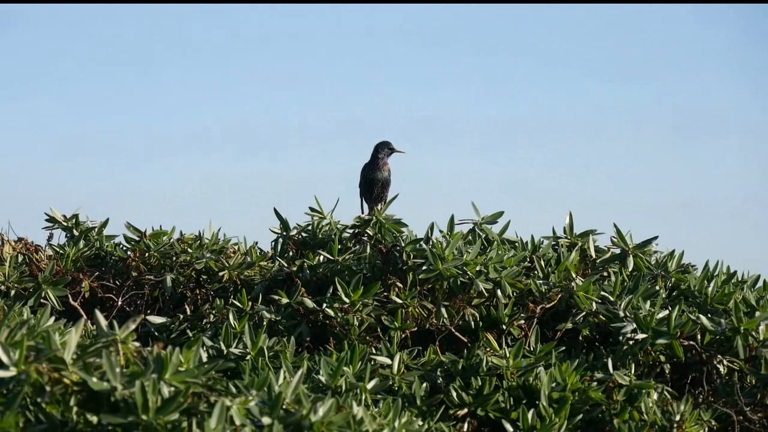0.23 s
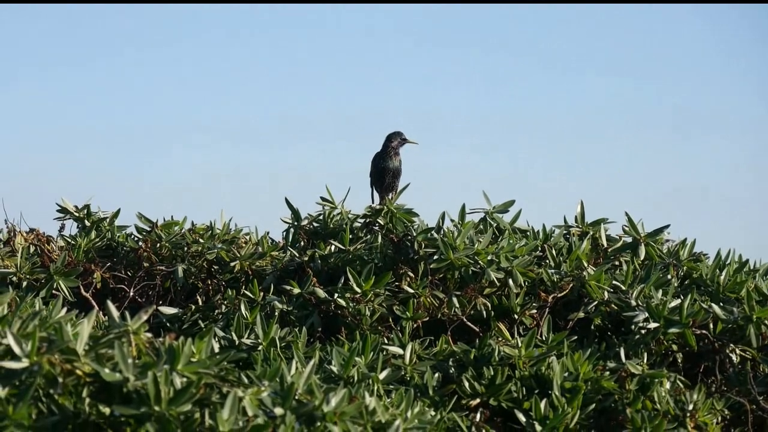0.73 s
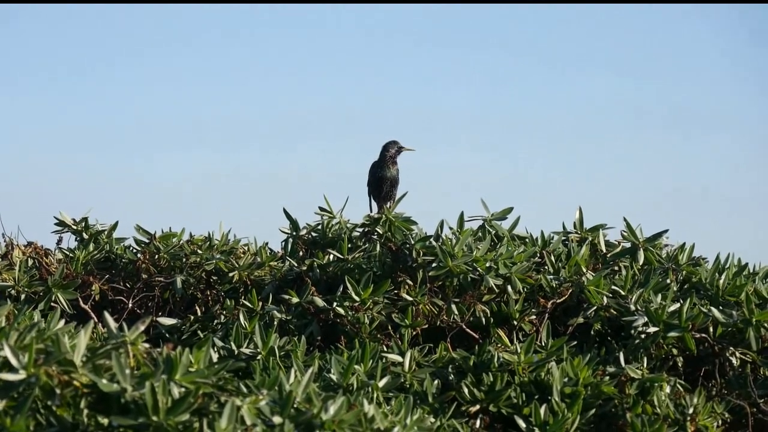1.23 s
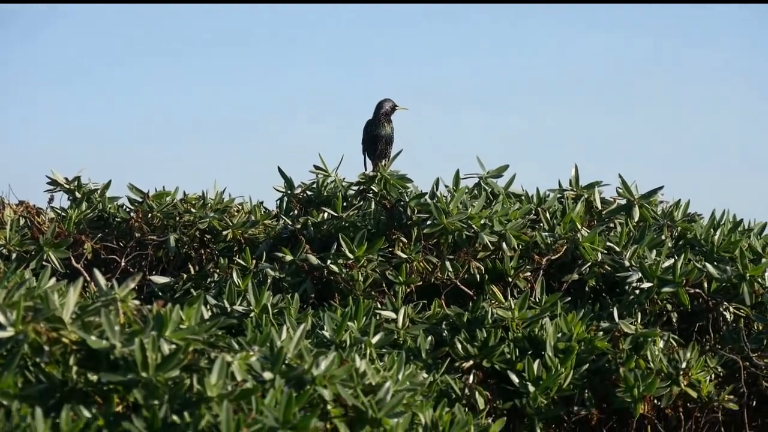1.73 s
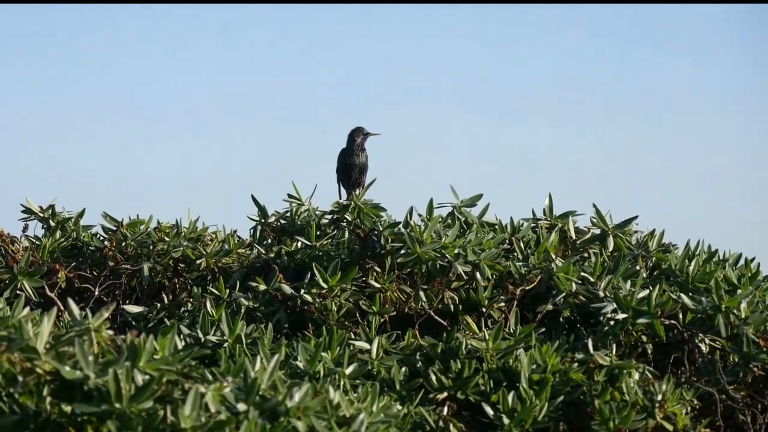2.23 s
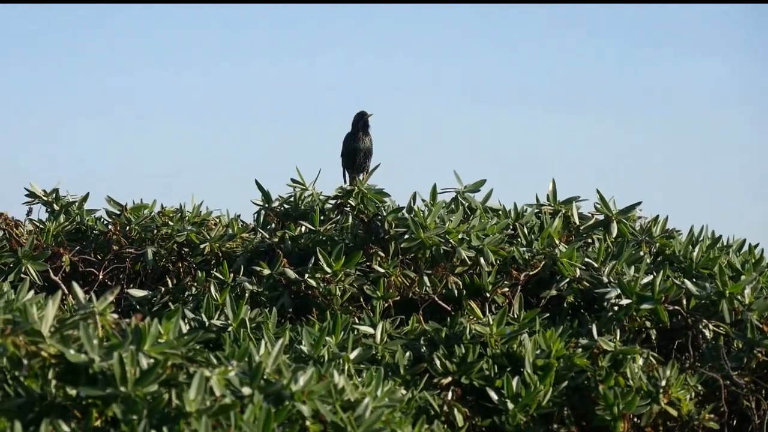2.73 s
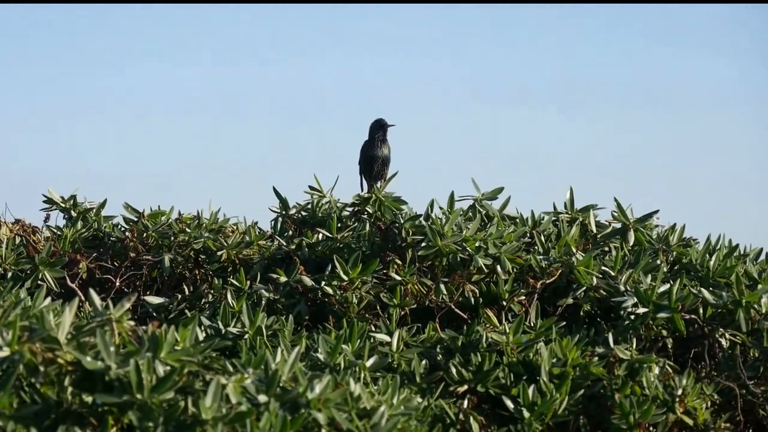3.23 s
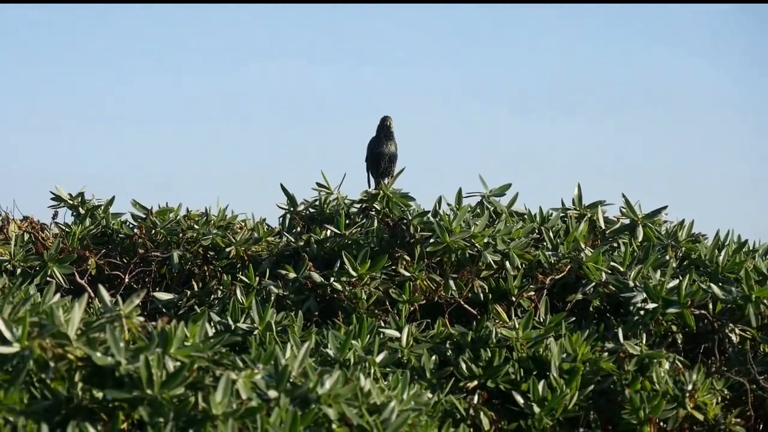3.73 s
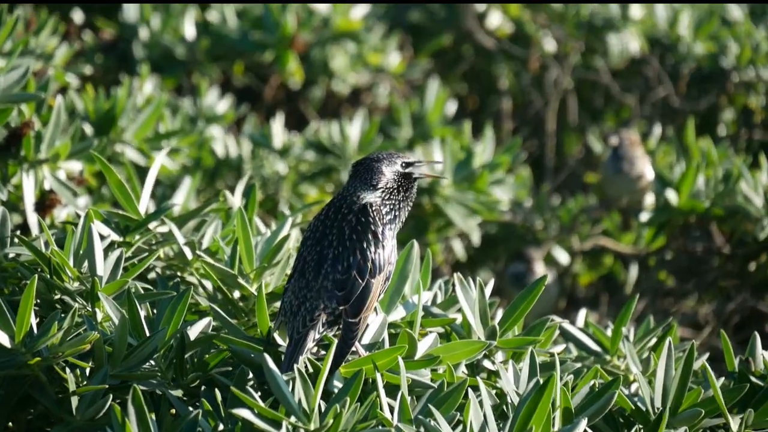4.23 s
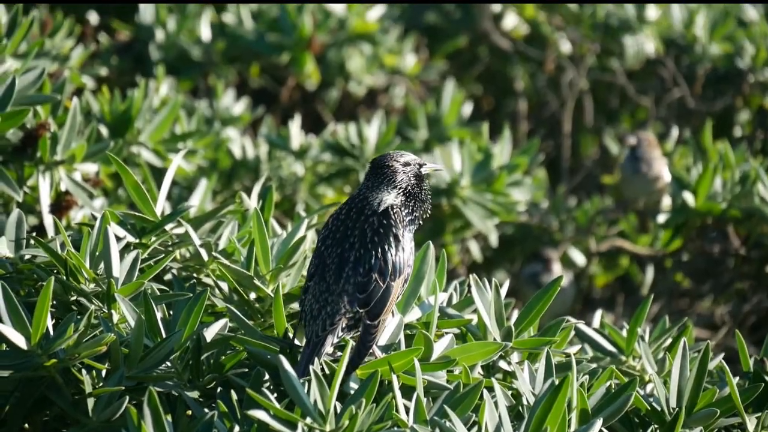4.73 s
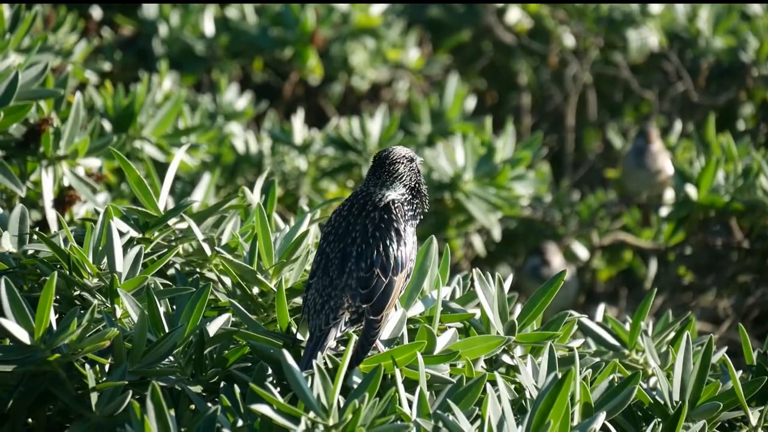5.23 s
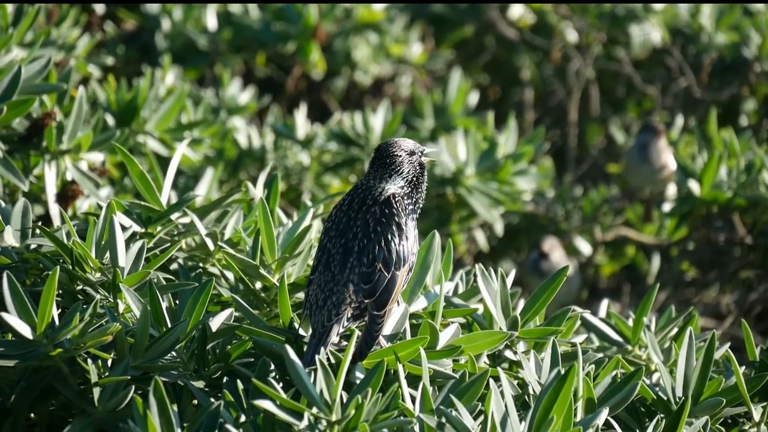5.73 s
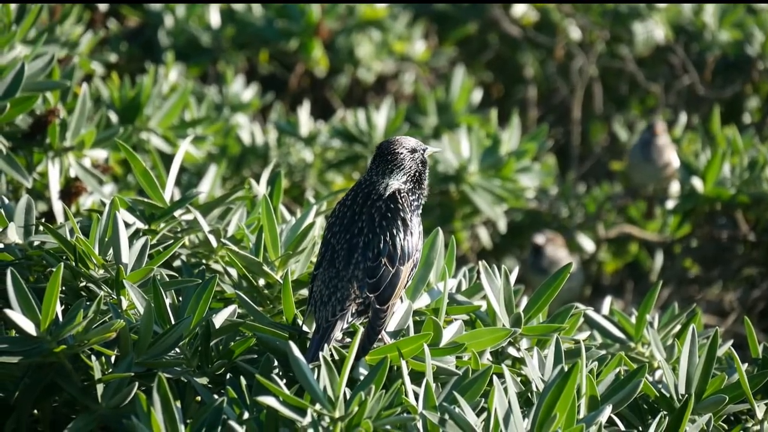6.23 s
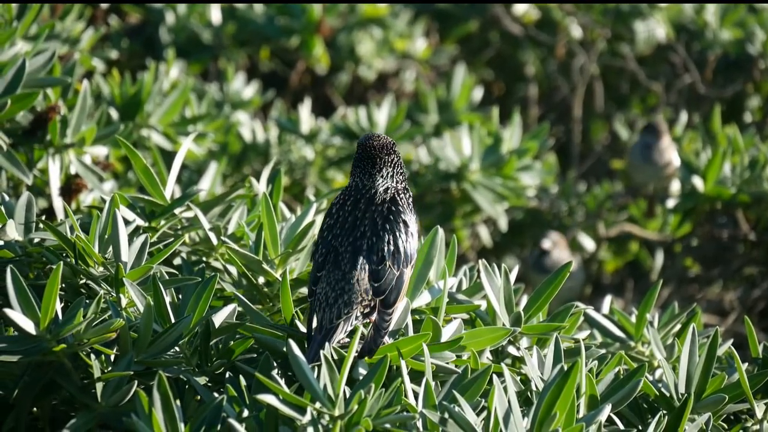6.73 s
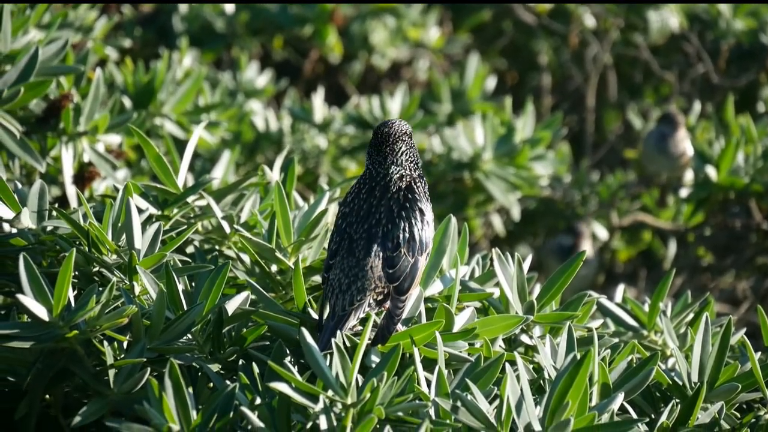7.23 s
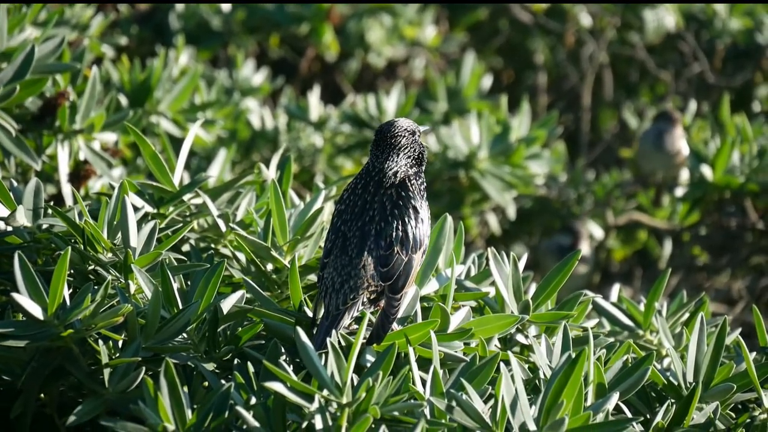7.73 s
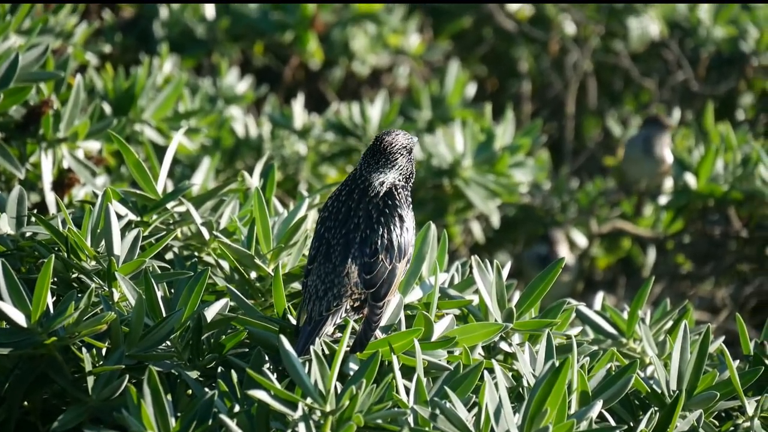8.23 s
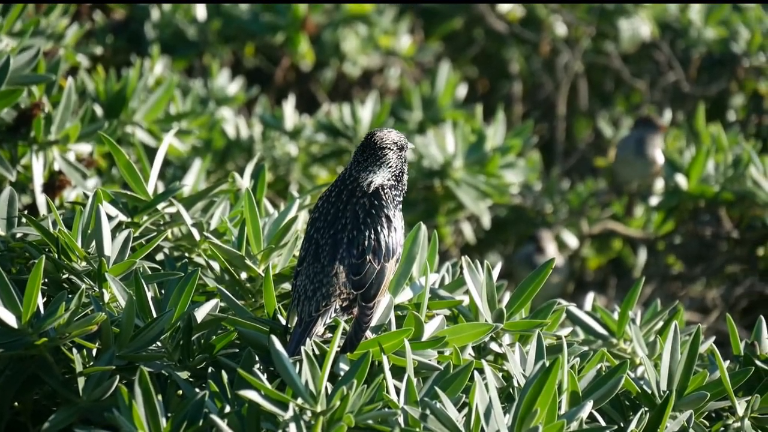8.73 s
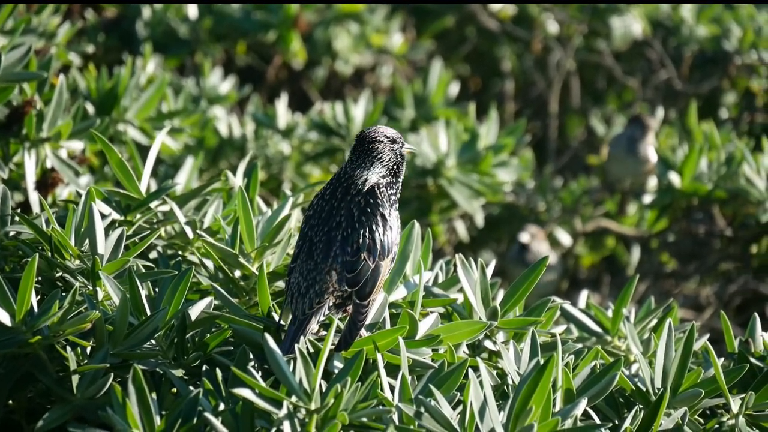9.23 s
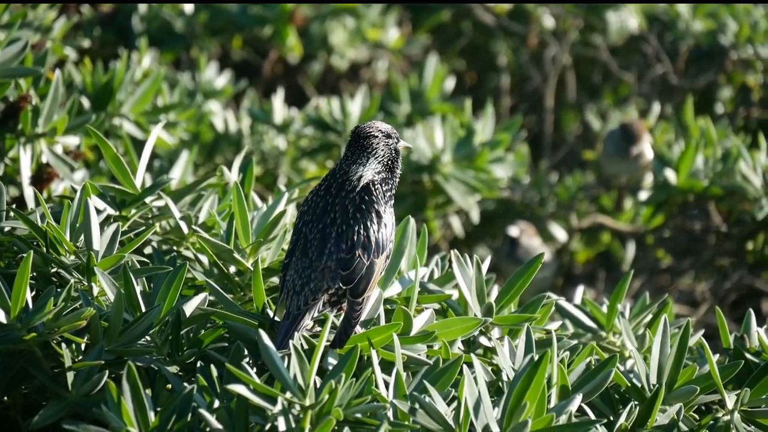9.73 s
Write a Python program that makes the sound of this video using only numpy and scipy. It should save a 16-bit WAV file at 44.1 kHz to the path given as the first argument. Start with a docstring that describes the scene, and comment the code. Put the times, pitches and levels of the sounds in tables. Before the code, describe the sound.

Outdoors by the sea, a flock of starlings chatters continuously in quick overlapping chirps, with nearer whistles, low whoops and a few rasps. Distant surf rumbles softly underneath, slightly to the right. A sharp bill snap comes before everything cuts to silence for a third of a second; then the chatter resumes louder and denser, with thin high seeps and later two buzzing trills. Stereo, open air, close leafy scatter.

```python
"""Surf rumbles, more to the right, under a flock of small birds chattering in a coastal hedge.
The surf is coloured noise. The flock is over a thousand short overlapping gliding tones, swelling in bouts.
Near birds stand out: gliding tones make whistles, whoops, thin seeps and trilled buzzes; noise makes rasps.
A low bump and a sharp bill snap are decaying tones with noise. Shortly after the snap, all sound stops briefly.
"""
import sys
import numpy as np
from scipy import signal
from scipy.fft import rfft, irfft, next_fast_len
from scipy.io import wavfile
from scipy.ndimage import uniform_filter1d, map_coordinates

SR = 44100
rng = np.random.default_rng(int(sys.argv[2]) if len(sys.argv) > 2 else 0)


def put_to_file(sound):
    """Save the sound as 16-bit audio at rate SR, in the file named by the first command-line argument."""
    columns = np.atleast_2d(sound).T  # one column per channel
    safe = np.clip(columns, -1, 1)
    whole_steps = np.round(safe * 32767)
    wavfile.write(sys.argv[1], SR, whole_steps.astype(np.int16))


N = 440118  # length in samples
T = np.arange(N) / SR  # time of each sample, s


def amp(db):
    """Turns decibels into a plain multiplier."""
    return 10 ** (np.asarray(db) / 20)


def unit(x):
    """Scales a sound to an rms of 1."""
    return x / np.sqrt(np.mean(x ** 2) + 1e-20)


def along(points, hz):
    """Reads (frequency, value) points on a log frequency axis."""
    f, v = np.transpose(points)
    return np.interp(np.log(hz + 1), np.log(f + 1), v)


def level_at(rows, t):
    """Reads (time, level) points at times t, with straight lines between them."""
    times, levels = np.transpose(rows)
    return np.interp(t, times, levels)


def wobble(rate):
    """A smooth random curve over the whole scene, with rate knots a second."""
    knots = rng.standard_normal(int(N * rate / SR) + 4)
    return map_coordinates(knots, [np.arange(N) * rate / SR])


def shake(rate, size):
    """A short jagged random curve, with rate knots a second."""
    knots = rng.standard_normal(int(size * rate / SR) + 2)
    return np.interp(np.arange(size) * rate / SR, np.arange(len(knots)), knots)


def filtered(x, response):
    """Multiplies the spectrum of x by a response that depends on frequency."""
    m = next_fast_len(N + SR // 2)  # spare room so that the end does not wrap to the start
    hz = np.fft.rfftfreq(m, 1 / SR)
    return irfft(rfft(x, m) * response(hz), m)[..., :N]


def rush(spectrum, side_db):
    """Coloured stereo noise of rms 1; more side level makes it wider."""
    noise = rng.standard_normal((2, N))
    mid, side = filtered(noise, lambda hz: amp(along(spectrum, hz)))
    side = amp(side_db) * side
    return unit(np.array([mid + side, mid - side]))


def add(out, start, sound, pan_db):
    """Adds a sound at its start time in s, louder on the left by pan_db."""
    part = out[:, round(start * SR):][:, :len(sound)]
    part += amp([[pan_db / 2], [-pan_db / 2]]) * sound[:part.shape[1]]


def note(length, hz, db, edge, rough_db, waver, trill=0, octave_db=-33):
    """A syrinx tone on a parabola through three pitches, unsteady in pitch and size, with a weak octave."""
    u = np.linspace(-1, 1, max(round(length * SR), 8))  # -1 at the start, 1 at the end
    slope = (hz[2] - hz[0]) / 2
    bend = (hz[0] + hz[2]) / 2 - hz[1]
    pitch = hz[1] + slope * u + bend * u ** 2
    pitch = pitch * (1 + waver * shake(110, len(u)))
    # a second membrane chops and shakes the tone, less toward its end
    beat = trill * (1 - u) * np.sin(2 * np.pi * 168 * T[:len(u)])
    phase = 2 * np.pi * (np.cumsum(pitch) / SR + rng.random()) + 3.2 * beat
    swell = np.clip((1 - abs(u)) / edge, 0, 1)  # fades in and out at the edges
    size = amp(db + rough_db * shake(250, len(u))) * swell * (1 + beat)
    return size * (np.sin(phase) + amp(octave_db) * np.sin(2 * phase))


def leaves(x):
    """Scattering in the foliage: a short dying tail of noise, partly different for each side."""
    t = T[:SR // 4]
    tail = rng.standard_normal((2, len(t))) * amp(-60 * t / 0.098)  # falls 60 dB in 0.098 s
    tail = tail + tail.mean(axis=0)  # the part both sides share
    return signal.fftconvolve(x, tail / np.linalg.norm(tail[0]), axes=1)[:, :N]


# slow rise and fall of the surf's rumble: (time [s], level [dB])
SURF = [(0, -44), (1.3, -52), (4, -49.5), (5.5, -44), (7.2, -44.5), (9.98, -51)]
# colour of the low rumble: (frequency [Hz], relative level [dB])
RUMBLE = [(25, -33), (75, -14), (125, -3), (230, -1), (310, -4.5), (450, -18), (900, -62.5)]
# colour of the smooth wash: (frequency [Hz], relative level [dB])
WASH = [(60, -75), (250, -18), (500, -2.5), (2000, -4), (5000, -12), (8000, -23.5), (12500, -57),
        (15500, -37.5)]


def surf():
    """Distant breakers: lumpy low noise under a smooth, wider wash of noise."""
    rumble_db = level_at(SURF, T) + 1.2 * wobble(5)
    wash_db = -43 + .7 * wobble(3) + 1.1 * wobble(14)
    rumble = amp(rumble_db) * rush(RUMBLE, side_db=-10)
    wash = amp(wash_db) * rush(WASH, side_db=-6.5)
    return rumble + wash


# far birds that never stop: (time [s], level [dB])
MURMUR = [(0, -39), (2, -39.5), (4.3, -35)]
# bouts of chatter from nearer birds: (start [s], length [s], level [dB])
BOUTS = [(0.267, 0.19, -35.5), (1.211, 0.15, -35), (2.053, 0.073, -31), (2.239, 0.13, -33),
         (2.569, 0.092, -33.5), (2.817, .15, -31.5), (3.08, 0.1, -32.5), (3.661, 0.47, -36),
         (4.285, 0.28, -29), (4.724, 0.13, -28.5), (4.919, 0.1, -33), (5.189, 0.26, -31.5),
         (5.496, 0.14, -30.5), (5.787, 0.13, -33), (6.008, 0.16, -29.5), (6.319, 0.12, -28),
         (6.585, 0.23, -34), (7.153, .35, -32.5), (7.526, 0.17, -34), (8.172, 0.2, -28),
         (9.286, 0.23, -30.5), (9.901, 0.1, -29)]
RISE_DB_PER_S, FALL_DB_PER_S = 248.5, 151  # before and after a bout


def chatter_db(t):
    """Level of the crowd: bouts rise, hold and fall, their power adding to the murmur of the far birds."""
    power = amp(2 * level_at(MURMUR, t))
    for start, length, db in BOUTS:
        rise = RISE_DB_PER_S * np.maximum(start - t, 0)
        fall = FALL_DB_PER_S * np.maximum(t - start - length, 0)
        power = power + amp(2 * (db - rise - fall))
    return 10 * np.log10(power)


# how the crowd's chirps carry: (frequency [Hz], relative level [dB])
REACH = [(1300, -19), (2600, -1.5), (6000, -5.5), (7600, -12.5), (13000, -29.5)]


def crowd():
    """Many chirps, arched, level or falling; both syrinx halves sound, and phrases open high and sink."""
    out = np.zeros((2, N))
    draws = rng.standard_normal((1350, 7))  # seven random traits for each chirp
    starts = np.sort(rng.random(len(draws))) * (N - 1) / SR
    rising_db = chatter_db(starts + .03) - chatter_db(starts - .03)
    middles = 4300 * np.exp(0.026 * rising_db)  # Hz, higher while the chatter grows
    for start, middle, (height, opening, ending, duration, nearness, place, split) in zip(starts, middles, draws):
        top = np.clip(middle * np.exp(.27 * height), 2700, 6200)
        first_half = top * np.exp([-.07 + .17 * opening, 0, -.2 + .16 * ending])
        second_half = first_half * np.exp(.15 * split)
        length = .047 * np.exp(.42 * duration)  # s
        db = 5 * min(nearness, 1.5)  # near and far birds
        pair = sum(note(length, hz, db, .5, 4, .024, trill=.07, octave_db=-14)
                   for hz in (first_half, second_half))
        add(out, start, pair, 0.17 + 0.5 * place)
    out = filtered(out, lambda hz: amp(along(REACH, hz)))
    out = out + amp(-5.5) * leaves(out)
    running_power = uniform_filter1d(np.mean(out ** 2, axis=0), 4000)
    running = np.sqrt(abs(running_power) + 1e-9)
    # the crowd is evened out, then follows the chatter's level
    return amp(chatter_db(T)) * out / running


def knocks():
    """A soft low bump and a sharp bill snap: dying tones mixed with scraping or crackling noise."""
    out, t = np.zeros((2, N)), T[:SR // 20]
    crack = uniform_filter1d(rng.standard_normal(len(t)), size=3)
    scuff = uniform_filter1d(rng.standard_normal(len(t)), size=36)
    scuff = scuff - uniform_filter1d(scuff, size=200)  # no deep bass in the scrape
    # the pitch drops as the bill shuts
    snap = np.sin(2 * np.pi * (1900 * t + 3 * (1 - np.exp(-t / 0.00083))))
    snap = amp(-16 - 60 * t / .02) * snap + amp(-17 - 60 * t / .004) * crack
    bump = amp(-29 - 60 * t / .1) * (np.sin(2 * np.pi * 330 * t) + 4.5 * scuff)
    add(out, 3.556, snap, 0)
    add(out, .224, bump, -2.5)
    return out


# single harsh rasps: (start [s], level [dB])
RASPS = [(1.194, -50), (1.488, -46), (2.62, -47.5), (2.764, -42.5)]
# colour of breath through the throat: (frequency [Hz], relative level [dB])
THROAT = [(200, -84.5), (2000, -0.5), (6000, -8.5), (11500, -8), (15000, -26.5)]
RASP_S = 0.097  # length of one rasp, s


def rasps():
    """Breathy noise through the throat: single rasps over a faint hiss that follows the crowd."""
    size = amp(chatter_db(T) - 22 + 3 * wobble(25))
    for start, db in RASPS:
        progress = np.clip((T - start) / RASP_S, 0, 1)
        size = size + amp(db) * np.sin(np.pi * progress) ** 2
    return size * amp(2.74 * wobble(70)) * rush(THROAT, side_db=-3.5)


# low whoops: (start [s], top pitch [Hz], level [dB])
WHOOPS = [(.293, 1820, -31.5), (0.797, 1584, -41.5), (1.681, 1650, -38), (1.82, 2240, -39.5),
          (2.562, 1570, -39), (2.628, 2542, -27.5), (3.314, 1980, -43), (3.529, 1606, -38),
          (3.758, 1676, -38.5), (4.237, 1680, -39), (4.708, 1947, -37.5), (5.256, 2440, -36),
          (5.991, 1856, -33), (9.877, 1820, -34.5)]
WHOOP_S = 0.0658  # length of one whoop, s


def whoops():
    """Low tones that rise and level off, with faint ones from far birds at random times."""
    out = np.zeros((2, N))
    far = rng.random((30, 2)) * [N / SR, 1000] + [0, 1500]  # (start [s], top pitch [Hz])
    for start, hz, db in [*WHOOPS, *((start, hz, -48) for start, hz in far)]:
        add(out, start, note(WHOOP_S, (.8 * hz, .985 * hz, 0.996 * hz), db, .25, 2.5, .008), -1.5)
    return out


# thin high seeps: (start [s], level [dB])
SEEPS = [(4.213, -40), (4.879, -50.5), (5.037, -49), (5.708, -44.5), (5.873, -47.5), (6.525, -43.5),
         (6.701, -44)]
SEEP_S, SEEP_HZ = 0.13, 8345  # length in s, middle pitch in Hz


def seeps():
    """Thin, high, nearly level tones with quick edges."""
    out = np.zeros((2, N))
    hz = SEEP_HZ * np.array([1.025, 1, 1.005])
    for start, db in SEEPS:
        add(out, start, note(SEEP_S, hz, db, 0.031, 3.9, 0.007), 4)
    return out


# two-part buzzes: (start [s], level [dB])
BUZZES = [(7.69, -27), (8.473, -20.5)]
# parts of a buzz: (delay [s], length [s], start [Hz], middle [Hz], end [Hz], level within the buzz [dB])
BUZZ_PARTS = [(0, 0.18, 7600, 7000, 5110, -3.5), (0.161, 0.14, 7600, 7580, 7440, -8.5)]


def buzzes():
    """High tones that a strong trill chops and shakes into a buzz."""
    out = np.zeros((2, N))
    for start, db in BUZZES:
        for delay, length, *hz, part_db in BUZZ_PARTS:
            add(out, start + delay, note(length, hz, db + part_db, 1.0, 2.1, 0.0078, trill=0.4), 4)
    return out


# falling whistles: (start [s], reference pitch [Hz], level [dB])
FALLS = [(0.04, 6040, -39.5), (0.314, 6180, -27.5), (1.242, 6040, -34.5), (3.365, 3405, -32),
         (4.3, 5400, -24), (4.763, 5900, -21.5), (5.208, 6480, -32.5), (5.882, 6500, -30.5),
         (6.059, 5870, -32), (6.18, 3580, -27.5), (6.38, 5960, -32), (6.641, 3635, -27.5),
         (7.269, 3546, -27.5), (7.61, 3560, -29.5), (9.369, 3600, -30.5), (9.44, 3056, -30.5),
         (9.168, 6020, -34.5), (9.714, 6000, -24.5)]
# shape of a fall: start, middle and end pitch over the reference [ratio]
FALL_SHAPE = (1.1, 0.95, .92)
# arched chirps, up and down again: (start [s], reference pitch [Hz], level [dB])
ARCHES = [(0.267, 6020, -31), (.335, 4520, -45), (.945, 4630, -28.5), (1.011, 4410, -28),
          (1.5, 4750, -34.5), (1.805, 4420, -31), (2.075, 5650, -32), (2.229, 4580, -25.5),
          (2.297, 4510, -27.5), (3.654, 4970, -29), (3.762, 4590, -26.5), (3.829, 4470, -25.5),
          (4.492, 5350, -21.5), (4.572, 4070, -25), (5.17, 5560, -31), (5.54, 4900, -27),
          (5.595, 5000, -30), (6.34, 5480, -30.5), (6.435, 4220, -28), (6.535, 5040, -42),
          (6.716, 4790, -31), (6.97, 5490, -30), (7.02, 4170, -28), (7.125, 5170, -31),
          (7.306, 5070, -25.5), (7.735, 5160, -29), (7.819, 4630, -27.5), (8.188, 4640, -29.5),
          (8.355, 5650, -23), (8.805, 4590, -25), (8.965, 4395, -33.5), (9.275, 4780, -34)]
# shape of an arch: start, middle and end pitch over the reference [ratio]
ARCH_SHAPE = (0.8, 0.98, 0.74)
# steep upward flicks: (start [s], middle pitch [Hz], level [dB])
RISES = [(4.273, 4220, -36), (8.228, 4080, -31.5), (8.331, 4050, -26.5)]
RISE_SHAPE = (0.34, 1, 1.3)  # start, middle and end over the middle pitch
# free glides: (start [s], length [s], start [Hz], middle [Hz], end [Hz], level [dB])
GLIDES = [(2.009, 0.084, 6900, 5600, 4260, -40), (2.68, 0.18, 2655, 2630, 2620, -39),
          (3.186, 0.23, 6430, 4050, 2680, -33), (4.387, 0.052, 5960, 6050, 6200, -26.5),
          (4.434, 0.057, 5450, 5700, 6420, -23.5), (5.055, 0.18, 2150, 2380, 2470, -52),
          (5.396, 0.18, 2460, 2660, 2850, -37.5), (5.445, 0.16, 4070, 3334, 3006, -30.5),
          (5.607, 0.079, 4490, 3540, 2400, -26), (5.842, 0.15, 3520, 3530, 3620, -32.5),
          (6.381, 0.037, 3860, 3480, 3740, -23), (6.89, 0.22, 2540, 2150, 1890, -47),
          (8.352, 0.17, 3390, 1994, 1630, -40.5), (8.404, 0.11, 5620, 6160, 5480, -29),
          (8.795, 0.14, 5070, 5370, 5300, -42)]
FALL_S, ARCH_S, RISE_S = .085, .05, .04  # length of each kind, s


def whistles():
    """Clear gliding tones: falls, arches, flicks and free glides; shorter ones waver and trill more."""
    out = np.zeros((2, N))
    calls = [(start, length, hz, db) for start, length, *hz, db in GLIDES]
    kinds = [(FALLS, FALL_S, FALL_SHAPE), (ARCHES, ARCH_S, ARCH_SHAPE), (RISES, RISE_S, RISE_SHAPE)]
    for rows, length, shape in kinds:
        calls += [(start, length, hz * np.array(shape), db) for start, hz, db in rows]
    for start, length, hz, db in calls:
        shortness = ARCH_S / length
        add(out, start, note(length, hz, db, .4, 3.5, .016 * shortness, trill=.06 * shortness), 1.5)
    return out


def soloists():
    """All tonal calls of the near birds, with the scatter of the leaves around them."""
    calls = whoops() + seeps() + buzzes() + whistles()
    return calls + amp(-3.5) * leaves(calls)


def scene():
    """Adds the layers, from the background to the near birds."""
    return surf() + crowd() + knocks() + rasps() + soloists()


# balance of the two sides: (frequency [Hz], left over right [dB])
SIDES = [(100, -2.5), (700, -4.5), (2800, 5), (6000, 1), (10000, 3), (14000, -6)]
# the short silence: start [s], end [s]
SILENCE = (3.887, 4.1955)
TOP_HZ = 15700  # nothing is kept from here up


def record(dry):
    """Colours left and right differently, mutes the silence, rolls off the treble and cuts the very top."""
    sides = filtered(dry, lambda hz: amp(np.outer([.5, -.5], along(SIDES, hz))))
    outside = np.maximum(SILENCE[0] - T, T - SILENCE[1])  # s away from the silence
    kept = np.clip(outside / .002, 0, 1)  # 2 ms fades
    return filtered(sides * kept, lambda hz: (hz < TOP_HZ) / (1 + (hz / 13000) ** 8))


dry = scene()
out = record(dry)
put_to_file(out)
```